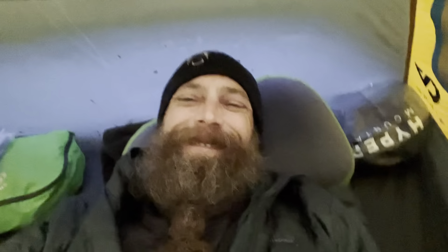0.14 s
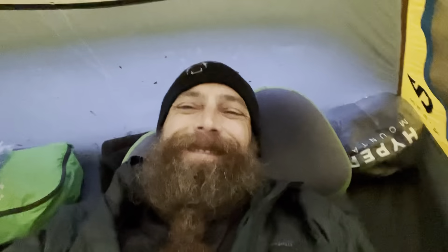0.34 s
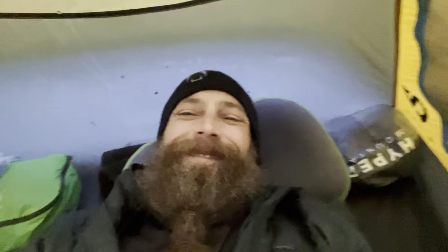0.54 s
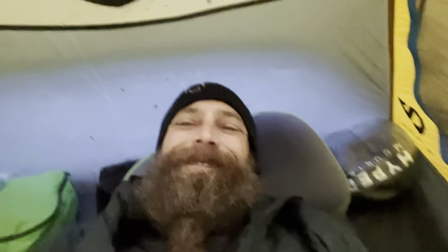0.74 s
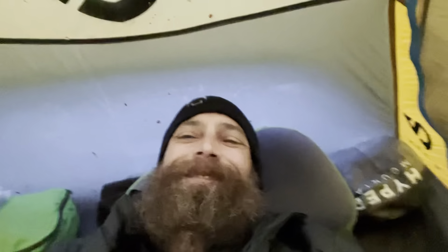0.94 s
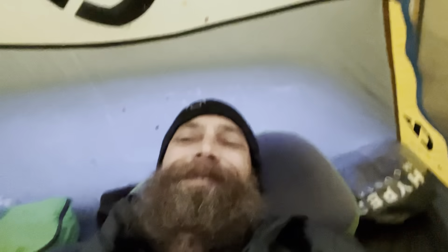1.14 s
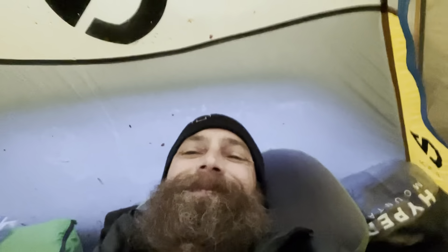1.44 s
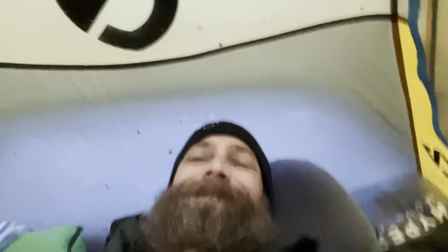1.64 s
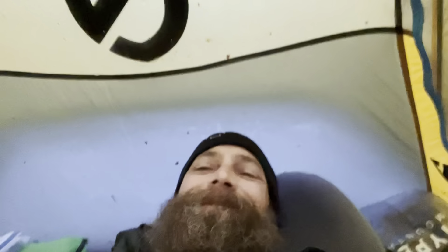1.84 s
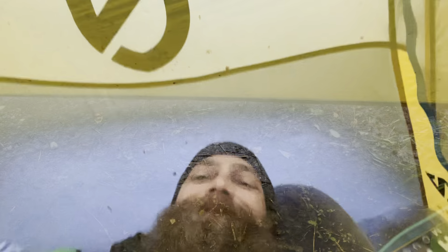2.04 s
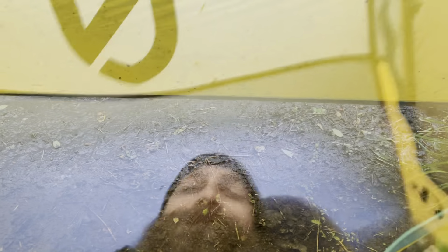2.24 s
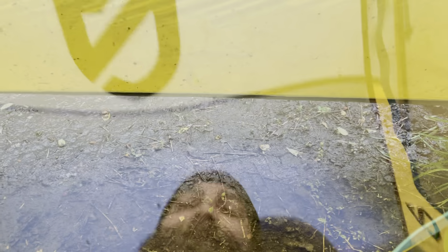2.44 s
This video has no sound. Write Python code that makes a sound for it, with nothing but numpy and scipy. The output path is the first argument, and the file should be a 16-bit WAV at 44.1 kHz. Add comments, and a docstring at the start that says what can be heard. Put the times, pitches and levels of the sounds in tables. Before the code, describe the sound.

Rain on a tent, heard from inside: steady fine patter, soft hiss and low drumming. Loud falling-pitch pocks of heavy drips cluster in the first half second, thin out to light ticks, then return near two seconds.

```python
"""Rain heard from inside a tent

Fine drops patter on the fabric over shaped noise: the wash and hiss of rain outside, low drumming.
Light drops tick close by: short noise bursts that ring small patches of fabric.
Heavy drips hit the taut sheet: each splashes and sends out a ripple whose highs arrive first,
a quick falling 'pock'. The drips thin out after the first half second, then return near 2 s.
"""
import sys
import numpy as np
from scipy import signal
from scipy.fft import rfft, irfft
from scipy.io import wavfile
from scipy.ndimage import uniform_filter1d

SR = 44100
rng = np.random.default_rng(int(sys.argv[2]) if len(sys.argv) > 2 else 0)


def inscribe(sig):
    """Save sig as 16-bit PCM at rate SR to the path in sys.argv[1].

    A 1-D sig is mono; a 2-D sig holds one channel per row.
    Samples are clipped to [-1, 1] before scaling.
    """
    pcm = np.round(np.clip(np.atleast_2d(sig).T, -1, 1) * 32767)
    wavfile.write(sys.argv[1], SR, pcm.astype(np.int16))


N = 114660
TIME = np.arange(N) / SR
HIT_TIME = TIME[:SR // 8]  # time axis of a single hit
HZ = np.fft.rfftfreq(2 * N, 1 / SR)


def amp(db):
    """Decibels to gain."""
    return 10 ** (np.asarray(db) / 20)


def evened(x):
    """Scales to rms 1."""
    return x / np.sqrt(np.mean(x ** 2) + 1e-20)


def spectrum_gain(points):
    """Gain at every HZ, drawn through (freq_hz, level_db) points on a log frequency axis."""
    freq_hz, level_db = np.transpose(points)
    return amp(np.interp(np.log(HZ + 1), np.log(freq_hz + 1), level_db))


def colour(x, points):
    """Causal minimum-phase filter with the given spectrum, made by folding its cepstrum."""
    cepstrum = irfft(np.log(spectrum_gain(points)))
    cepstrum[1:N] *= 2
    cepstrum[N + 1:] = 0
    taps = irfft(np.exp(rfft(cepstrum)))[:SR // 20]
    return signal.fftconvolve(x, taps[None], axes=1)[:, :x.shape[1]]


def add(mix, start_s, sound):
    """Mixes a sound in at its start time."""
    part = mix[:, max(round(start_s * SR), 0):][:, :sound.shape[1]]
    part += sound[:, :part.shape[1]]


def pan(side_db):
    """Left and right gains for a left-minus-right level difference."""
    return amp([[side_db / 2], [-side_db / 2]])


# Strength of the rain layers over time, before each layer's trim:
# time_s, patter_db, hiss_db, drumming_db, wash_db
RAIN_STRENGTH = [(0, -65, -54, -63, -52), (.09, -46, -58.5, -62.5, -53), (.36, -58, -54.5, -59, -52.5),
                 (.5, -52.5, -57, -64, -52), (.64, -46, -60.5, -60.5, -59), (.76, -52.5, -56.5, -63, -53.5),
                 (.94, -51.5, -56, -56.5, -54.5), (1.19, -50, -56.5, -68, -54.5),
                 (1.29, -48, -56, -58, -54), (1.48, -49, -57, -63.5, -52.5), (1.57, -51, -57.5, -58.5, -51),
                 (1.68, -49.5, -56.5, -67.5, -53.5), (1.88, -50.5, -55.5, -59.5, -52),
                 (1.98, -52.5, -56, -68, -59), (2.14, -53, -55, -67.5, -61),
                 (2.33, -48.5, -58.5, -65.5, -61), (2.5, -49, -55.5, -58.5, -56),
                 (2.6, -51, -53.5, -56.5, -46.5)]


def strength(column):
    """One of the rain's level curves as a gain."""
    rows = np.array(RAIN_STRENGTH)
    return amp(np.interp(TIME, rows[:, 0], rows[:, column]))


def merged_drops(points, flicker_db):
    """Countless drops merge into coloured noise; flicker_db is the rms wander of its level."""
    flicker = evened(signal.resample(rng.standard_normal(N // 500), N))
    noise = colour(rng.standard_normal((2, N)), points)
    return evened(noise * amp(flicker_db * flicker))


# Spectrum of the low drumming: freq_hz, level_db (per Hz)
DRUMMING_SPECTRUM = [(20, -55), (40, -2.5), (65, -3.5), (130, -2), (270, 0), (500, -10.5), (1500, -33),
                     (16000, -78)]
DRUMMING_TRIM_DB = 3
DRUMMING_BLEND = 0.42  # gain of the drumming that crosses to the other ear


def drumming():
    """Low drumming of the sheet: noise without flicker, partly shared between the ears."""
    noise = merged_drops(DRUMMING_SPECTRUM, flicker_db=0.0)
    drum = amp(DRUMMING_TRIM_DB) * strength(3) * noise
    return drum + DRUMMING_BLEND * drum[::-1]


# Spectrum of the wash outside: freq_hz, level_db (per Hz)
WASH_SPECTRUM = [(30, -44), (200, -20), (450, -2), (630, 0), (1000, -2), (1900, -7.5), (2900, -13),
                 (4800, -27), (7500, -27), (16000, -29)]
WASH_TRIM_DB = 3


def wash():
    """The broad wash outside: far drops merged into mid-range noise with a flickering level."""
    return amp(WASH_TRIM_DB) * strength(4) * merged_drops(WASH_SPECTRUM, flicker_db=2.5)


# Spectrum of the hiss of rain on the ground: freq_hz, level_db (per Hz)
HISS_SPECTRUM = [(30, -91), (2500, 4.5), (4500, 3.5), (6300, -0.5), (7800, -12), (10000, -7), (12500, -11),
                 (14500, -16), (16000, -30)]
HISS_TRIM_DB = -0.5


def hiss():
    """Rain on the ground: far drops merged into bright noise with a flickering level."""
    return amp(HISS_TRIM_DB) * strength(2) * merged_drops(HISS_SPECTRUM, flicker_db=1.97)


# Spectrum of the patter on the fabric: freq_hz, level_db (per Hz)
PATTER_SPECTRUM = [(30, -13), (100, -4), (300, -5), (620, -7), (1100, -4), (1900, 0.5), (2800, -8),
                   (4500, -11.5), (7500, -26), (11000, -18), (16000, -45)]
DROPS_PER_S = 1300  # over all patches, before the clustering
SIZE_SPREAD_DB = 3  # scale of the random drop size
CLUSTER_S, CLUSTER_DB = 0.025, 3.5  # spacing of the random density curve, its rms swing
GRAIN_S = 0.0015  # decay of a rustle, before each patch's random factor
PATCH_LOW_HZ, PATCH_HIGH_HZ = 525, 2620
PATCH_CYCLES = 1.95  # cycles in which a patch tone falls to 1/e
PATCH_DB = -10.5  # patch tone against rustle


def patter(count=40):
    """Fine drops land in clusters on patches of fabric, each with its own short rustle and pitch."""
    out = np.zeros((2, N))
    t = TIME[:SR // 50]
    density = evened(signal.resample(rng.standard_normal(round(N / SR / CLUSTER_S)), N))
    chance = amp(CLUSTER_DB * density) * DROPS_PER_S / count / SR
    for hz in np.geomspace(PATCH_LOW_HZ, PATCH_HIGH_HZ, count):
        rustle_decay = np.exp(-t / (GRAIN_S * rng.uniform(0.65, 2.1)))
        rustle = evened(rng.standard_normal((2, len(t))) * rustle_decay)
        tone = np.sin(2 * np.pi * (hz * t + rng.random((2, 1))))
        tone = evened(tone * np.exp(-t * hz / PATCH_CYCLES))
        size = amp(SIZE_SPREAD_DB * np.minimum(rng.exponential(1, N), 3.2))
        landings = size * (rng.random(N) < chance)
        grain = rustle + amp(PATCH_DB) * tone
        patch_sound = signal.oaconvolve(landings[None], grain, axes=1)[:, :N]
        out += pan(rng.normal(0, 4.2)) * patch_sound
    return strength(1) * evened(colour(out, PATTER_SPECTRUM))


def burst_filter(points):
    """The click that has a given spectrum."""
    return colour(signal.unit_impulse(SR // 50)[None], points)


SPLASH_RISE = 0.6  # rise time as a share of the splash length
SPRAY_DB, SPRAY_S = -11.5, 0.012  # droplets thrown off: energy against the splash, fall time


def splash(response, length_s):
    """A burst of water, even in spectrum, drives a response; has the energy of 10 ms at rms 1."""
    t = HIT_TIME
    spray = amp(SPRAY_DB) * np.sqrt(length_s / SPRAY_S) * np.exp(-t / SPRAY_S)
    envelope = (1 - np.exp(-t / (SPLASH_RISE * length_s))) * (np.exp(-t / length_s) + spray)
    z = rfft(rng.standard_normal((2, len(t))) * envelope, 2 * len(t))
    # divide by the smoothed spectrum to even it out
    smooth_power = uniform_filter1d(abs(z) ** 2, size=120, axis=1)
    burst = irfft(z / np.sqrt(smooth_power))[:, :len(t)]
    burst = signal.fftconvolve(burst, response, axes=1)[:, :len(t)]
    return burst / np.linalg.norm(burst, axis=1, keepdims=True) * np.sqrt(SR / 100)


def ring(hz, rise_s, decay_s):
    """One damped mode of the fabric: a sine that swells and dies away."""
    envelope = (1 - np.exp(-HIT_TIME / rise_s)) * np.exp(-HIT_TIME / decay_s)
    return (envelope * np.sin(2 * np.pi * hz * HIT_TIME))[None]


RING_CYCLES, HIGH_RING_CYCLES = 0.88, 2.2  # cycles in which a ring falls to 1/e


def patch(hz, cycles, length_s):
    """A patch of fabric rings under a splash."""
    return splash(ring(hz, 0.5 / hz, cycles / hz), length_s)


# Spectrum of a light drop's splash: freq_hz, level_db
TICK_SPECTRUM = [(100, 0), (500, 4), (1000, 12.5), (2000, 4.5), (4000, -5), (7500, -23.5), (11000, -20),
                 (16000, -28)]
# Spectrum of its high sizzle: freq_hz, level_db
SIZZLE_SPECTRUM = [(100, -18), (3000, -6), (6000, -2), (11000, -8.5), (16000, -6)]
# Light drops close by: start_s, splash_db, side_db (left minus right), sizzle_db, ring_hz
LIGHT_DROPS = [(0.594, -45, 2, -61, 1370), (.608, -46, 7, -57, 1900), (.619, -46, -4, -49.5, 1310),
               (0.6362, -48.5, 2, -65, 1870), (.658, -47.5, -4, -62, 1870), (.936, -45.5, -1, -66, 1470),
               (1.028, -49, 4, -59, 1400), (1.091, -48.5, -1, -58, 1600), (1.227, -49, 1, -71, 1860),
               (1.303, -47.5, -2, -62, 1910), (1.362, -49.5, -4, -60, 1200), (1.375, -55, -2, -62, 1480),
               (1.470, -50, 3, -52.5, 1900), (1.6624, -46.5, 1, -53.5, 754), (1.8848, -44.5, 2, -79, 850),
               (1.931, -44, 3, -54, 1400), (1.9432, -43.5, -3, -64, 785), (1.9986, -46.5, -1, -60, 1520),
               (2.010, -50, 0, -59, 1600), (2.2912, -45.5, 2, -61, 960), (2.3777, -43, -1, -60, 1880),
               (2.4014, -43.5, -4, -71, 1090)]
TICK_S = 0.00059  # splash length
TICK_RING_DB = -8  # patch ring against splash


def ticks():
    """Light drops close by splash and ring a small patch, with a high sizzle of varying strength."""
    out = np.zeros((2, N))
    click, sizzle = burst_filter(TICK_SPECTRUM), burst_filter(SIZZLE_SPECTRUM)
    for start_s, splash_db, side_db, sizzle_db, ring_hz in LIGHT_DROPS:
        tap = splash(click, TICK_S) + amp(TICK_RING_DB) * patch(ring_hz, RING_CYCLES, TICK_S)
        drop = amp(splash_db) * tap + amp(sizzle_db) * splash(sizzle, TICK_S)
        add(out, start_s, pan(side_db) * drop)
    return out


RIPPLE_END_HZ = 48.6  # pitch the ripple levels out towards
RIPPLE_LIFE_MS = 60  # by then the ripple has run out into the slack cloth
RIPPLE_ROUGH = 0.07  # rms of the noise mixed into the sine
RIGHT_LAG_S = 0.0001  # the right channel starts this much later
SEAM_S, SEAM_DB = 0.0038, -18.5  # a seam throws the ripple back


def ripple(drop_hz, glide_ms, rise_ms, decay_ms):
    """A bending wave in the sheet: its pitch falls fast, then levels out; a seam returns a weaker copy."""
    ms = 1000 * np.maximum(HIT_TIME - np.array([[0], [RIGHT_LAG_S]]), 0)
    pitch_hz = RIPPLE_END_HZ + drop_hz / (1 + ms / glide_ms) ** 2
    turns = np.cumsum(pitch_hz * (ms > 0), axis=1) / SR
    roughness = evened(uniform_filter1d(rng.standard_normal(ms.shape), size=24, axis=1))
    envelope = (1 - np.exp(-ms / rise_ms)) * np.exp(-ms / decay_ms - (ms / RIPPLE_LIFE_MS) ** 2)
    wave = envelope * (np.sin(2 * np.pi * turns) + RIPPLE_ROUGH * roughness)
    add(wave, SEAM_S, amp(SEAM_DB) * wave)
    return wave


# Ripples of heavy drips, and two faint low thumps of the fabric (1.551 and 1.736 s): start_s, level_db,
# drop_hz (starting pitch above the end pitch), glide_ms, rise_ms, decay_ms, side_db (left minus right)
SHEET_RIPPLES = [(0.0517, -31.5, 990, 3.9, 0.42, 3.6, 11), (0.2017, -9.5, 1200, 3.16, 0.7, 7.7, 8),
                 (0.2319, -25.5, 1490, 2.8, 4.2, 3.8, -16), (0.304, -23, 696, 4.6, 7.5, 5.3, 8),
                 (0.3223, -12.5, 1250, 2.6, 1.03, 2.3, 10), (.4105, -21, 505, 4.4, 8.8, 8.4, 7.5),
                 (0.447, -30, 1410, 2.13, 0.97, 3.5, 19.5), (0.4487, -27, 327, 8.1, 3.2, 8.5, 1.5),
                 (.5465, -31, 1266, 2.7, 0.1, 3.1, -10), (0.8608, -37, 1630, 2.09, 0.34, 10.4, 6),
                 (1.0001, -18.5, 626, 5.64, 11.6, 5.3, 7), (1.551, -42, 60, 7.1, 11, 18, 4),
                 (1.736, -40, 90, 8.9, 9.6, 11, 0), (2.0503, -17.5, 640, 5, 9.2, 3.07, 6),
                 (2.434, -27, 1250, 3.4, 3.3, 9, 8), (2.511, -16.5, 880, 5, 12, 4.9, 3)]
# Splashes of heavy drips: start_s, level_db, length_ms, side_db (left minus right),
# low_hz and low_db (low ring of the struck patch), high_hz, high_db and high_side_db (high ring)
DRIP_SPLASHES = [(.051, -45, 1.3, 5, 1520, -45.5, 3640, -58.5, -8),
                 (0.2014, -25.5, 0.88, -3.5, 1650, -36, 2800, -37, -14.5),
                 (0.2317, -46, 2.6, 9.5, 2100, -48, 3820, -56, -7),
                 (0.3002, -50.5, 0.74, 9, 900, -55, 2100, -55, 11),
                 (0.3208, -39, 0.98, 7.5, 1530, -33.5, 2120, -37.5, -7),
                 (0.3995, -39.5, 4.8, 0.5, 770, -39, 2260, -66, -4),
                 (0.4092, -40, 2.1, 3, 2160, -42, 6100, -48, 2),
                 (0.442, -38.5, 1.4, -1, 1210, -55, 3330, -47, -3),
                 (0.445, -41, 1.6, 3, 1800, -51, 5270, -49.5, 3),
                 (.5455, -42, 1.2, 1, 755, -42, 3000, -46, -10.5),
                 (0.848, -46, 4.4, 5, 1620, -52.5, 4230, -44.5, 4),
                 (0.86, -40.5, 2.5, 3, 1170, -47, 5600, -49, 5),
                 (.9985, -41.5, 3, 2, 784, -42.5, 1620, -52, 7),
                 (2.051, -64, 1.5, -8, 1500, -60, 4300, -69, 0),
                 (2.4346, -44.5, 2, 1.5, 1770, -57, 3200, -47.5, 0),
                 (2.5082, -38.5, 3.9, -2, 1820, -57, 5250, -46.5, -3),
                 (2.5344, -44, 1.5, -3, 500, -46, 2100, -56, -8)]
# Spectrum of a heavy splash: freq_hz, level_db
SPLASH_SPECTRUM = [(60, -60), (300, 7.5), (800, 1), (1500, 9.5), (2700, 2), (4000, -3.5), (6000, -7),
                   (8000, -17), (11000, -10), (16000, -24)]
# the whole sheet swings with each ripple or thump; level is against it
SWAY_HZ, SWAY_DB, SWAY_RISE_S, SWAY_DECAY_S = 63.6, -36, 0.023, 0.056


def drips_and_thumps():
    """Heavy drips splash, ring their patch, send out ripples and sway the sheet; two thumps only sound low."""
    out = np.zeros((2, N))
    click = burst_filter(SPLASH_SPECTRUM)
    sway = amp(SWAY_DB) * ring(SWAY_HZ, SWAY_RISE_S, SWAY_DECAY_S)
    for start_s, level_db, drop_hz, glide_ms, rise_ms, decay_ms, side_db in SHEET_RIPPLES:
        sheet = ripple(drop_hz, glide_ms, rise_ms, decay_ms) + sway
        add(out, start_s, pan(side_db) * amp(level_db) * sheet)
    for row in DRIP_SPLASHES:
        start_s, level_db, length_ms, side_db, low_hz, low_db, high_hz, high_db, high_side_db = row
        length_s = length_ms / 1000
        water = amp(level_db) * splash(click, length_s)
        low_ring = amp(low_db) * patch(low_hz, RING_CYCLES, length_s)
        high_ring = amp(high_db) * patch(high_hz, HIGH_RING_CYCLES, length_s)
        add(out, start_s, pan(side_db) * (water + low_ring))
        add(out, start_s, pan(high_side_db) * high_ring)
    return out


TENT_DB, TENT_DECAY_S = -16.5, 0.007


def tent(x):
    """Short, soft reflections between the fabric walls: decaying noise taps after a 3 ms gap."""
    t = HIT_TIME
    taps = rng.standard_normal((2, len(t))) * np.exp(-t / TENT_DECAY_S) * (t > 0.003)
    taps /= np.linalg.norm(taps[0])
    return x + amp(TENT_DB) * signal.fftconvolve(x, taps, axes=1)[:, :N]


def scene():
    """Wash, hiss and drumming under the patter, with the close drops and thumps reflected in the tent."""
    background = wash() + hiss() + drumming()
    return background + patter() + tent(ticks() + drips_and_thumps())


# Stereo width by frequency: freq_hz, side_db (gain of the left-right difference)
STEREO_WIDTH = [(50, -1.5), (250, -4.5), (600, 0), (1300, 0), (3000, -2), (7000, 3), (9500, 4.5),
                (11500, -27), (16000, 4)]
EDGE_HZ = 15700  # upper band limit


def record(dry):
    """Shapes stereo width by frequency and cuts rumble; then the band limit."""
    difference = (dry[0] - dry[1]) / 2
    side = irfft(rfft(difference, 2 * N) * spectrum_gain(STEREO_WIDTH))[:N]
    pair = dry.mean(0) + np.array([side, -side])
    pair = signal.sosfilt(signal.butter(4, 44, "highpass", fs=SR, output="sos"), pair)
    lowpass = signal.firwin(255, EDGE_HZ, window=("kaiser", 9), fs=SR)
    return signal.oaconvolve(pair, lowpass[None], "same")


dry = scene()
out = record(dry)
inscribe(out)
```